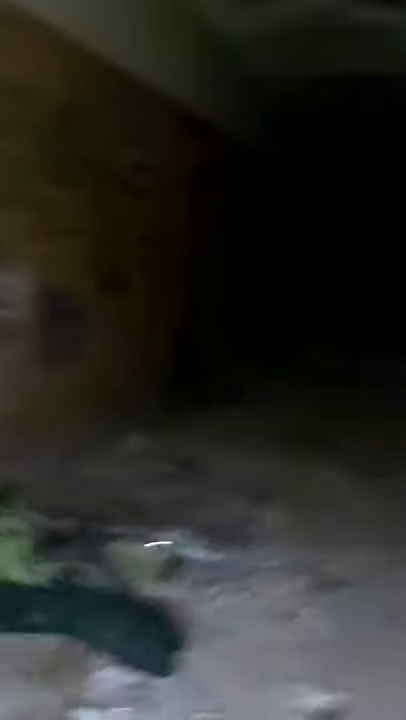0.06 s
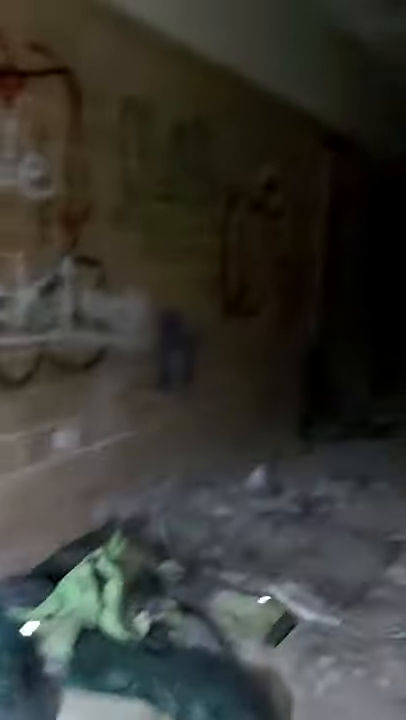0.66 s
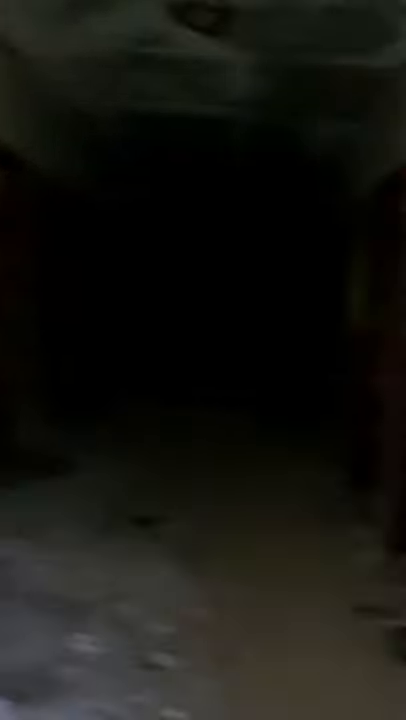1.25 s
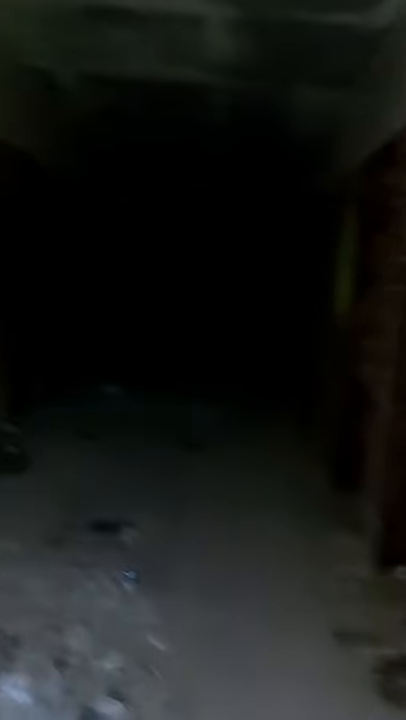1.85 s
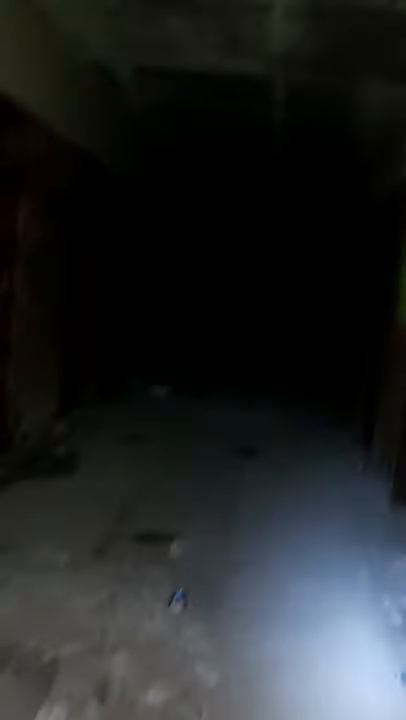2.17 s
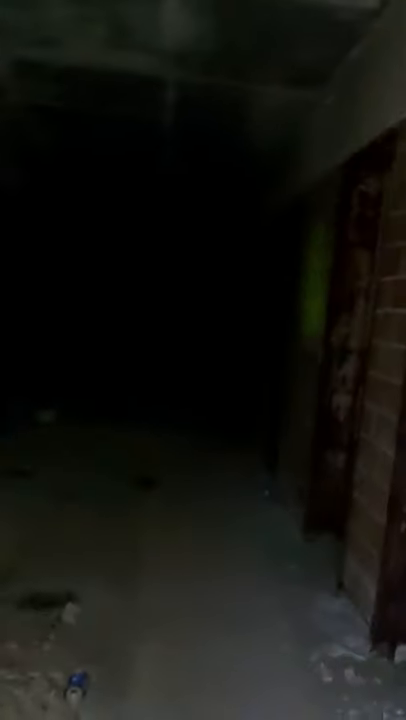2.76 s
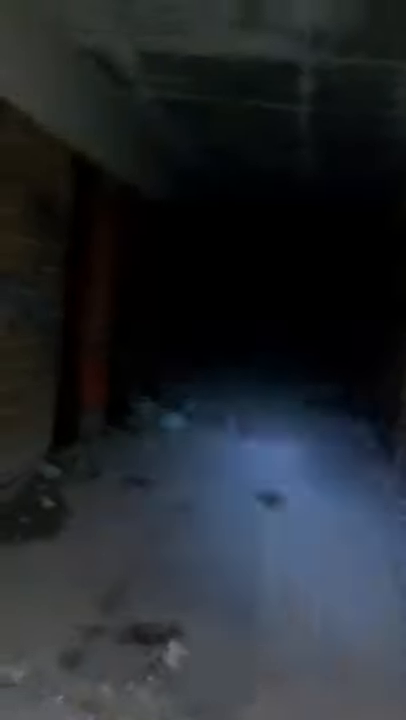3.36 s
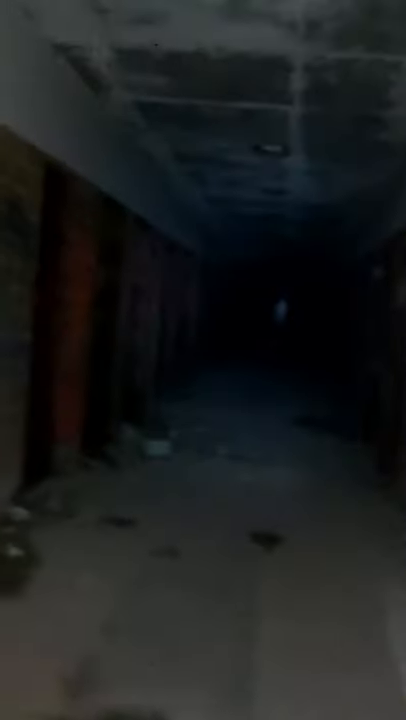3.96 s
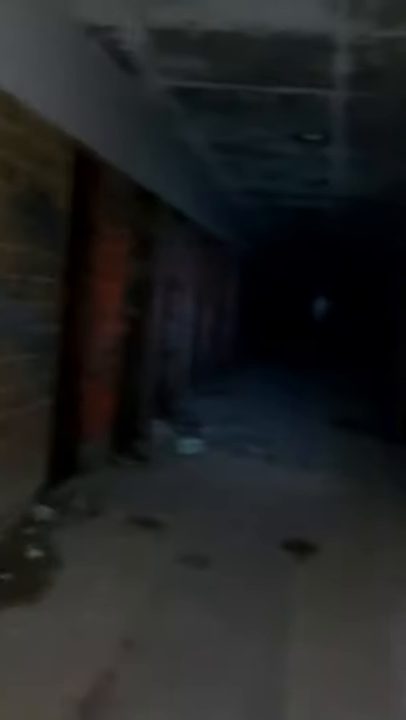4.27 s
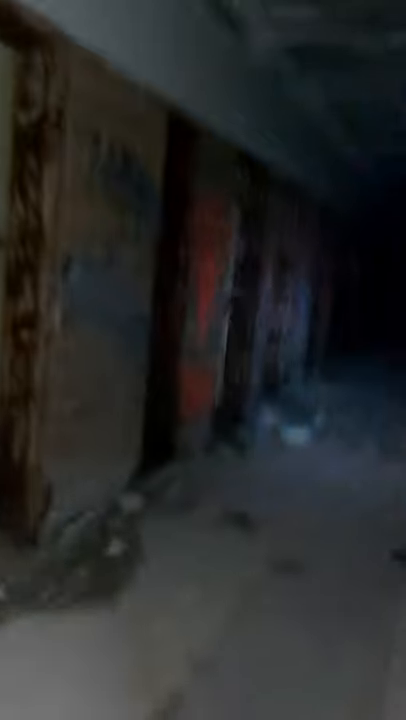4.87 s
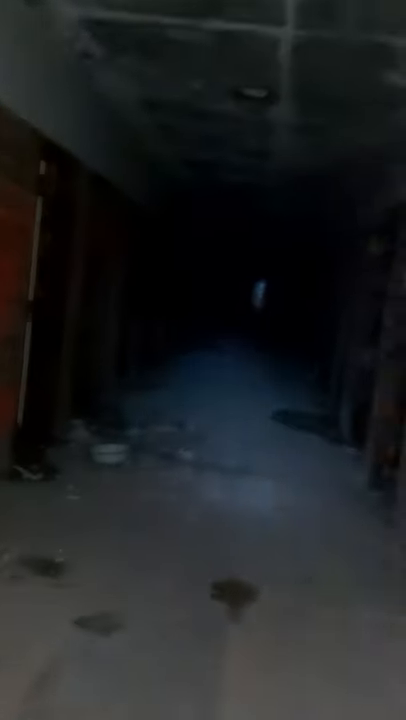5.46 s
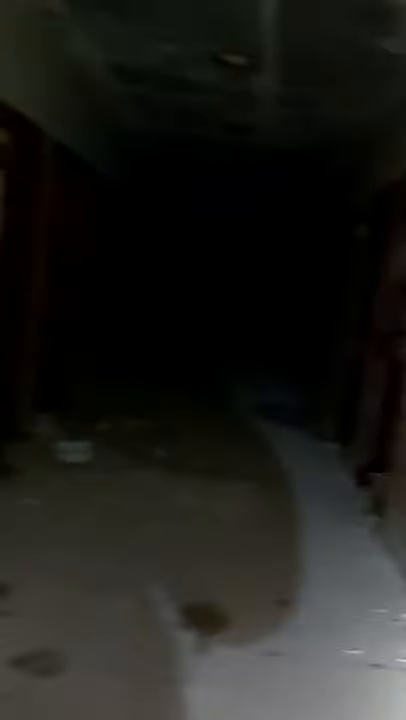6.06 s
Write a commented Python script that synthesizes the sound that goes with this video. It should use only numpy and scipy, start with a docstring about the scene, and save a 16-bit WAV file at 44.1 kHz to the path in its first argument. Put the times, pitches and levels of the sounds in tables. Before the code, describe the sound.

Slow footsteps crunch over grit and broken plaster in an empty concrete corridor. The first steps are heavy, with dull heel thuds, sharp snaps and a tiny chink of glass. They turn lighter, with soft scuffs and cracking chips, until one loud, crisp crunch near the end. The walls add a short echo and a faint hollow drone. The close handheld microphone picks up a few small ticks from the hand.

```python
"""Slow footsteps crunch over grit and plaster debris on the concrete floor of a long empty corridor.
Each sole contact crushes a shower of grains, a random train of impulses that excites brief resonances;
single chips crack under the shoe, heels thud, bits of grit snap and glass splinters chink.
The bare walls answer with quick reflections, a duller tail and a wavering hollow drone;
the hand bumps and ticks on the microphone."""
import sys
import numpy as np
from scipy import signal
from scipy.fft import rfft, irfft
from scipy.io import wavfile
from scipy.ndimage import uniform_filter1d

SR = 44100
rng = np.random.default_rng(int(sys.argv[2]) if len(sys.argv) > 2 else 0)


def log_audio(samples):
    """Write samples as a 16-bit WAV file to the path given in sys.argv[1]."""
    # one column per channel
    frames = np.atleast_2d(samples).T
    # limit to full scale, then quantise
    limited = np.clip(frames, -1, 1)
    pcm = np.round(limited * 32767).astype(np.int16)
    wavfile.write(sys.argv[1], SR, pcm)


N = 269318


# Footfalls: (time [s], heel lead [s], full weight [s], crunch [dB], grain pitch [Hz], fine grit [dB])
FOOTFALLS = [(0.005, 0.0077, 0.033, -29, 1590, -39.5), (0.369, 0.042, 0.048, -27.5, 1670, -29.5),
             (0.908, 0.027, 0.017, -27.5, 1960, -25), (1.681, 0.057, 0.13, -41.5, 2440, -33.5),
             (2.461, 0.053, 0.071, -51, 1920, -42), (3.303, 0.004, 0.065, -53, 1830, -37.5),
             (4.075, 0.057, 0.022, -47.5, 1800, -42.5), (4.924, 0.0049, 0.011, -21.5, 4450, -23.5),
             (5.675, 0.043, 0.071, -41.5, 2650, -40.5)]
def steps(press_t60_s=0.063, roll_t60_s=0.34):
    """Contact force drives the crunch in three phases: heel touch, full weight, roll of the sole."""
    out, t = np.zeros(N), np.arange(SR * 3 // 4) / SR
    for s, lead, hold, crunch_db, hz, grit_db in FOOTFALLS:
        touch = from_db(-6) * envelope(t, lead, press_t60_s)
        press = envelope(t - lead, hold, press_t60_s)
        roll = from_db(-38) * envelope(t - lead, hold, roll_t60_s)
        load = np.max([touch, press, roll], axis=0)
        add(out, s - lead, crush(s, load, crunch_db, hz, grit_db))
    return out


# Drags of the sole: (time [s], rise [s], slide [s], crunch [dB], grain pitch [Hz], fine grit [dB])
SOLE_DRAGS = [(0.134, 0.0032, 0.035, -35.5, 1340, -40), (0.233, 0.0096, 0.029, -35.5, 1780, -42),
              (0.487, .006, 0.014, -43, 1080, -66), (0.87, 0.0022, 0.02, -53, 1220, -32.5),
              (0.888, .003, 0.01, -53, 3000, -39), (0.998, 0.012, 0.078, -54, 2700, -42),
              (1.068, 0.014, 0.014, -37, 1800, -48), (1.187, 0.018, 0.09, -52.5, 2040, -48),
              (1.362, 0.039, 0.034, -53, 1800, -50), (1.692, 0.0043, 0.023, -46, 4700, -34),
              (1.856, 0.0027, 0.031, -43, 2610, -62), (1.924, 0.022, 0.16, -50, 1160, -49),
              (2.063, 0.012, 0.17, -52.5, 1950, -55.5), (2.265, 0.0024, 0.031, -43, 4300, -35),
              (2.582, 0.011, 0.058, -48, 2170, -45), (2.968, 0.0038, 0.14, -62, 2310, -50),
              (3.011, 0.0025, 0.0067, -47, 5940, -55), (3.086, 0.0026, 0.0077, -38, 4130, -54),
              (3.715, 0.061, 0.14, -49.5, 2140, -45.5), (3.935, 0.00084, 0.15, -61, 2550, -46),
              (4.113, 0.0047, 0.0049, -41, 6540, -55), (4.21, .03, 0.15, -79, 2500, -53.5),
              (4.377, 0.0034, 0.83, -53, 2330, -53), (4.647, 0.0015, 0.038, -44.5, 2610, -58),
              (4.772, 0.015, 0.19, -55.5, 1830, -45), (5.107, 0.0047, 0.075, -39.5, 2400, -36.5),
              (5.369, 0.0084, 0.011, -47.5, 2250, -37.5), (5.466, 0.0044, 0.13, -54, 2900, -43.5),
              (5.846, 0.0028, 0.052, -38.5, 3070, -35), (5.977, 0.018, 0.1, -45, 2110, -47)]
def scuffs(sag_db_per_s=19.5):
    """Sliding friction: a sole bites into the grit and eases off."""
    out, t = np.zeros(N), np.arange(SR // 2) / SR
    for s, rise, slide, crunch_db, hz, grit_db in SOLE_DRAGS:
        load = envelope(t, slide, t60=0.22, attack=rise) * from_db(-sag_db_per_s * t)
        add(out, s, crush(s, load, crunch_db, hz, grit_db))
    return out


# Rub of the sole at a crunch of -40 dB, loudest on the deep litter at the start: (time [s], level [dB])
SOLE_RUB = [(0, -41), (1.0, -41.5), (2.3, -59), (4.1, -52.5), (4.9, -65)]
# Click spectrum of one fine grain: (frequency [Hz], level [dB])
GRIT_SPECTRUM = [(200, -15.5), (500, -2), (1200, 1), (2800, 3), (4600, 3), (6200, -1.5), (8000, -2.5),
                 (9200, 1), (11500, -0.5), (16000, 4.5)]
def crush(s, load, crunch_db, hz, grit_db, size_spread=1.246, ring_spread=1.536):
    """Shot noise: a stick-slip load drives fine grit, the sole's dull rub and three sizes of grain."""
    count = len(load)
    load = load * from_db(2.5 * waver(count, per_s=217.2))
    rub_db = np.interp(s, *np.transpose(SOLE_RUB)) + 0.9 * (crunch_db + 40)
    grit_click = unit_energy(coloured(signal.unit_impulse(128, 64), GRIT_SPECTRUM))
    layers = [(grit_db, grit_click, fractures(count, per_s=2200, uneven_db=6.5)),
              (rub_db, grain_ring(hz=501, spread=1.564), fractures(count, per_s=2000, uneven_db=4.5))]
    for size in (1 / size_spread, 1, size_spread):
        ring = grain_ring(hz / size, ring_spread) / np.sqrt(3)
        layers.append((crunch_db, ring, fractures(count, per_s=830, uneven_db=3.5)))
    return sum(from_db(db) * signal.fftconvolve(clicks * load, ring)[:count]
               for db, ring, clicks in layers)


def fractures(count, per_s, uneven_db):
    """A Poisson process of impulses, mostly small and a few large; rms 1."""
    sizes = from_db(uneven_db * np.minimum(rng.exponential(1, count), 4))
    signs = rng.choice([-1, 1], count)
    breaks = rng.random(count) < per_s / SR
    return unit_energy(sizes * signs * breaks) * np.sqrt(count)


def grain_ring(hz, spread, size=1024):
    """Impulse response of one grain: the wider its band, the briefer its ring."""
    return unit_energy(band(signal.unit_impulse(size), hz / spread, hz * spread))


# Breaking chips, the row at 1.6927 s being a strong wall reflection of the chip just before it: (time [s],
# level [dB], pitch [Hz], corridor send [dB], 60 dB decay [cycles])
PLASTER_CHIPS = [(0.136, -27, 740, -3, 4.8), (0.17, -25, 750, -14, 7.1), (0.3823, -19, 4230, -25, 26),
                 (0.417, -25.5, 1840, 3, 9.6), (0.5917, -27, 1000, -20, 3.7), (0.8253, -39, 4060, 4.5, 3.6),
                 (0.878, -25, 800, -5.5, 5.4), (1.685, -18, 2180, -20, 9), (1.6927, -17, 2160, -16, 8.4),
                 (1.719, -21, 4720, -4.5, 19), (1.7728, -16.5, 1750, -12, 6.7),
                 (1.785, -20.5, 1620, -10, 7.6), (1.795, -25, 1640, -8, 18), (2.035, -16.5, 2230, -10, 7.7),
                 (2.658, -36, 2010, -2, 3.3), (3.088, -31.5, 2400, -7, 13), (3.1, -31, 2360, -7, 12),
                 (3.302, -34.5, 2900, -1.5, 4.4), (3.327, -28.5, 2100, -12.5, 4),
                 (3.829, -36.5, 2360, -9, 12), (4.026, -35, 2600, -14, 7.4), (4.088, -31, 1820, -3.5, 4.1),
                 (4.124, -26, 5750, -5, 12.6), (4.899, -31, 4000, 3, 16), (4.919, -19, 2600, -18, 5.9),
                 (4.929, -19, 4560, -9, 7), (4.9406, -15.5, 4470, -3.5, 9),
                 (5.221, -20.5, 1710, -11.5, 7.9), (5.294, -23, 1790, -24, 9.1),
                 (5.4537, -21.5, 2320, -17, 5.1), (5.6376, -27.5, 2320, -10, 7.6),
                 (5.6806, -24.5, 2100, -7, 6.6), (5.891, -25, 2250, -11, 4.8),
                 (6.059, -35, 1720, -3.5, 10.5)]
def chips(overtone_ratio=1.97, wall_echo_s=0.0087, wall_echo_db=-9.5):
    """Brittle fracture excites two damped modes; a wall reflects them. Gives near and corridor feeds."""
    near, sent, t = np.zeros(N), np.zeros(N), np.arange(SR // 50) / SR
    for s, db, hz, room_db, cycles in PLASTER_CHIPS:
        age, phase = t * hz / cycles, 2 * np.pi * hz * t
        modes = np.sin(phase) + from_db(-15.5) * np.sin(phase * overtone_ratio)
        ring = modes * np.minimum(age / 0.12, 1) * from_db(-60 * age)
        crack = band(rng.standard_normal(len(t)) * decay(t, t60=0.0023), hz / 2, hz * 3.5)
        sound = from_db(db + 11.5) * (unit_peak(ring) + from_db(-9) * crack)
        for delay, path_db in ((0, 0), (wall_echo_s, wall_echo_db)):
            add(near, s + delay, from_db(path_db) * sound)
            add(sent, s + delay, from_db(path_db + room_db) * sound)
    return near, sent


def crumbs():
    """Damping sets bandwidth: each chip sheds grains near its pitch, broader the less it rings."""
    out, t = np.zeros(N), np.arange(SR // 8) / SR
    load = envelope(t, hold=0.0049, t60=0.07)
    for s, db, hz, _, cycles in PLASTER_CHIPS:
        add(out, s, crush(s, load, db - 16, hz, db - 15.5, size_spread=1.07, ring_spread=1 + 1.9 / cycles))
    return out


# The loudest snaps of grit: (time [s], level [dB], pitch [Hz])
GRIT_SNAPS = [(0.3714, -13, 4230), (0.9095, -3, 3550), (0.919, -8, 11900), (0.9214, -8, 12200),
              (1.6268, -31, 5040), (1.9947, -26.5, 6500), (2.6568, -21.5, 4260), (2.6645, -33, 4500),
              (3.0873, -12.5, 11300), (3.0944, -10.5, 12300), (4.0245, -26, 3350), (4.1235, -18.5, 12000),
              (4.8288, -20.5, 13200), (4.9275, -5.5, 11800), (4.9404, -6, 4630), (5.466, -18, 5800)]
def snaps(table, t60, gain_db, body_db, sparkle_db):
    """A brief transient has a broad spectrum, here with a pitched body and a glassy top."""
    out, t = np.zeros(N), np.arange(SR // 50) / SR
    for s, db, hz, *_ in table:
        broad, body, top = rng.standard_normal((3, len(t))) * decay(t, t60)
        burst = (unit_energy(band(broad, 1770, 10500))
                 + from_db(body_db) * unit_energy(band(body, hz / 1.25, hz * 1.19))
                 + from_db(sparkle_db) * unit_energy(band(top, 10960, 17000)))
        add(out, s, from_db(db + gain_db) * unit_peak(burst))
    return out


# Heel thuds and knocks on the litter: (time [s], level [dB], pitch [Hz])
HEEL_THUDS = [(0.23, -21, 268), (0.2488, -16, 318), (0.261, -28.5, 130), (0.59, -30.5, 312),
              (0.88, -22.5, 350), (0.924, -17, 540), (1.113, -27.5, 504), (2.027, -25, 526),
              (4.024, -38, 433), (4.122, -37.5, 520), (5.2, -36, 310)]
def thuds():
    """A soft impact puts its energy into low frequencies: heels land dully."""
    out = np.zeros(N)
    for s, db, hz in HEEL_THUDS:
        add(out, s, from_db(db - 9) * soft_blow(hz, cycles=4.2))
    return out


def soft_blow(hz, cycles):
    """A heavily damped oscillation of one or two swings; peak 1."""
    t = np.arange(SR // 6) / SR
    return unit_peak(np.sin(2 * np.pi * hz * t) * t * decay(t, cycles / hz))


def loose_grains(crunch):
    """Amplitude modulation: sand springs away in glassy clicks that follow the crunch's treble."""
    treble_power = uniform_filter1d(band(crunch, 5500, 19845) ** 2, size=600)
    grinding = np.sqrt(np.maximum(treble_power, 0))
    rings = [grain_ring(hz, spread=1.05, size=128) for hz in (5200, 11800, 14000)]
    clicks = sum(np.convolve(fractures(N, per_s=160, uneven_db=-5), ring)[:N] for ring in rings)
    return from_db(-20) * grinding * clicks


# Glass shifting underfoot: (time [s], level [dB], pitch [Hz])
GLASS_SPLINTERS = [(1.019, -30, 10670), (1.053, -36, 11500), (5.219, -30, 14200), (5.294, -33, 14000)]
def splinters(spread=1.04):
    """Narrow resonance: a splinter rocks under the sole with a thin, high chink."""
    out, t = np.zeros(N), np.arange(SR // 30) / SR
    for s, db, hz in GLASS_SPLINTERS:
        chink = band(rng.standard_normal(len(t)) * decay(t, t60=0.03), hz / spread, hz * spread)
        add(out, s, from_db(db) * unit_peak(chink))
    return out


# Reverberation time of the corridor: (frequency [Hz], 60 dB decay [s])
REVERB_TIMES = [(120, 0.71), (400, 0.72), (1000, 0.55), (3000, 0.57), (6000, 0.45), (14000, 0.46)]
def corridor_response(build_up_s=0.0011, early_db=-5.5, tail_db=-7):
    """Reverberation: near walls give dense early reflections; the hall rings on, longest in the bass."""
    t = np.arange(SR) / SR
    white = rng.standard_normal((2, SR))
    edges = np.geomspace(40, 19000, num=10)
    tail = 0
    for low, high in zip(edges, edges[1:]):
        t60 = at_hz(REVERB_TIMES, np.sqrt(low * high))
        tail += band(rng.standard_normal((2, SR)), low, high) * decay(t, t60)
    arrival = np.minimum(t / build_up_s, 1) ** 2
    early = from_db(early_db) * unit_energy(white * arrival * decay(t, t60=0.074))
    late = from_db(tail_db) * unit_energy(tail * arrival)
    return two_ports(early + late, coherence=0.033)


def corridor(x, patterns=5, crossfade_s=0.014):
    """Echo paths depend on position: as feet and microphone move, the sound meets changing patterns."""
    place = np.arange(N) / SR / crossfade_s
    out = 0
    for k in range(patterns):
        distance = np.abs((place - k) % patterns - patterns / 2)
        share = np.cos(np.pi / 2 * np.minimum(distance, 1))
        out += signal.fftconvolve((x * share)[None], corridor_response(), axes=1)[:, :N]
    return out


# Modes between walls, floor and ceiling: (frequency [Hz], 60 dB decay [s], gain [dB])
CROSS_MODES = [(122, 0.19, 8), (297, 0.75, -10.5), (420.6, 0.19, 3.5)]
def standing_waves(x):
    """Each cross mode of the corridor rings as a damped second-order resonator."""
    out = np.zeros(N)
    for hz, t60, db in CROSS_MODES:
        radius = decay(1 / SR, t60)
        feedback = [1, -2 * radius * np.cos(2 * np.pi * hz / SR), radius ** 2]
        out += from_db(db) * signal.lfilter([1 - radius, 0, radius - 1], feedback, x)
    return out


# Dry ticks at the right microphone port: (time [s], level [dB], pitch [Hz], hollow knock [dB])
HAND_TICKS = [(1.115, -22, 13500, -39), (1.4378, -33, 1430, -30), (2.872, -27, 7200, -36),
              (2.901, -29.5, 7200, -36.5), (3.6228, -39.5, 2200, -57), (3.6325, -42, 15000, -62),
              (4.0356, -27, 14600, -28)]
# Bumps of the hand on a port: (time [s], level [dB], pitch [Hz], left minus right [dB])
HAND_BUMPS = [(3.148, -65, 70.4, -27), (3.761, -62, 63, -26), (4.63, -53, 58, 25), (5.116, -51.5, 118, -21),
              (5.195, -56, 55, -23)]
def handling(tick_leak_db=-43):
    """Structure-borne sound: ticks and bumps of the hand reach mainly one port and never the room."""
    ticks = snaps(HAND_TICKS, t60=0.004, gain_db=3, body_db=-3, sparkle_db=3.5)
    knock = unit_peak(grain_ring(hz=1720, spread=1.96))
    for s, _, _, knock_db in HAND_TICKS:
        add(ticks, s, from_db(knock_db) * knock)
    left, right = from_db(tick_leak_db) * ticks, ticks
    for s, db, hz, pan_db in HAND_BUMPS:
        bump = from_db(db + 9.5) * soft_blow(hz, cycles=4.8)
        add(left, s, from_db(min(pan_db, 0)) * bump)
        add(right, s, from_db(min(-pan_db, 0)) * bump)
    return np.array([left, right])


# Swells of the corridor's drone: (time [s], level [dB])
DRONE_LEVELS = [(0.0, -34), (0.2, -50), (0.24, -34), (0.5, -56), (0.83, -105), (0.882, -39), (1.05, -50),
                (1.268, -58.5), (1.511, -70.5), (1.77, -44), (2.1, -53.5), (2.42, -58.5), (2.62, -70),
                (2.93, -72), (3.03, -59.5), (3.42, -54), (3.62, -93), (3.79, -52.5), (3.97, -62),
                (4.15, -59.5), (4.6, -59), (5.75, -59.5), (5.9, -53.5)]
# Spectrum of the drone: (frequency [Hz], spectral density [dB])
DRONE_SPECTRUM = [(60, -26.5), (130, -14), (220, -12.5), (275, -8.5), (318, 0), (390, -7.5), (480, -4.5),
                  (630, -15.5), (1500, -31.5)]
def hollow_drone(waver_db=2):
    """Noise with a spectral peak has a faint pitch: a hollow drone near 318 Hz that swells and wavers."""
    db = np.interp(np.arange(N) / SR, *np.transpose(DRONE_LEVELS)) + waver_db * waver(N, per_s=16)
    return from_db(db - 4) * diffuse_noise(DRONE_SPECTRUM)


# Still air of the building: (frequency [Hz], spectral density [dB])
AIR_SPECTRUM = [(25, -4), (60, 5), (120, 1), (200, -7), (330, 2.5), (700, -7.5), (1600, -6.5), (2500, -1.5),
                (5000, -6.5), (9000, -13), (12000, -10.5), (16000, -2)]
def still_air():
    """Stationary broadband noise forms the faint ambient floor."""
    return from_db(-62) * diffuse_noise(AIR_SPECTRUM)


def diffuse_noise(spectrum):
    """A diffuse field is only weakly coherent between the ports in the treble; rms 1."""
    noise = two_ports(coloured(rng.standard_normal((2, N)), spectrum), coherence=0.16)
    return noise / noise.std()


# Left port against the right: (frequency [Hz], gain [dB])
LEFT_GAIN = [(40, -17), (130, -5.5), (600, -5), (1300, -4.5), (2500, -6.5), (5500, -3), (9000, 5),
             (13000, -8)]
def two_ports(pair, coherence, lag_s=0.00052, left_first=0.58, crossover_hz=420):
    """Spatial coherence: from two unrelated signals, bass is shared; treble meets either port first."""
    hz = np.fft.rfftfreq(pair.shape[-1], 1 / SR)
    treble = hz ** 2 / (hz ** 2 + crossover_hz ** 2)
    delay = np.exp(-2j * np.pi * hz * lag_s * treble)
    shared = (1 - treble * (1 - coherence)) * (left_first / delay + (1 - left_first) * delay)
    right, unrelated = rfft(pair)
    left = shared * right + np.sqrt(np.maximum(1 - np.abs(shared) ** 2, 0)) * unrelated
    return irfft(np.array([left * from_db(at_hz(LEFT_GAIN, hz)), right]), pair.shape[-1])


def round_the_hand(x, size=64):
    """Diffraction round the hand smears sound over about a millisecond and keeps its colour."""
    smear = irfft(np.exp(2j * np.pi * rng.random(size // 2 + 1)))
    return np.convolve(x, smear, "same")


def envelope(t, hold, t60, attack=0.001):
    """Linear rise of at least 1 ms, then exponential decay from time `hold`."""
    return np.clip(t / max(attack, 0.001), 0, 1) * decay(np.maximum(t - hold, 0), t60)


def waver(count, per_s):
    """Interpolated Gaussian noise, spread about 1."""
    return np.interp(np.arange(count) * per_s / SR, np.arange(count), rng.standard_normal(count))


def decay(t, t60):
    return from_db(-60 * t / t60)


def from_db(db):
    return 10 ** (np.asarray(db) / 20)


def unit_energy(x):
    return x / np.sqrt(np.sum(x ** 2, axis=-1, keepdims=True) + 1e-20)


def unit_peak(x):
    return x / np.abs(x).max()


def at_hz(points, hz):
    """Interpolation on a log-frequency axis."""
    frequencies, values = np.transpose(points)
    return np.interp(np.log(np.maximum(hz, 1)), np.log(frequencies), values)


def add(track, s, sound):
    """Superpose a sound on a track at time s."""
    start = int(np.clip(s * SR, 0, N - 1))
    track[start:start + len(sound)] += sound[:N - start]


def band(x, low_hz, high_hz):
    edges = [low_hz, min(high_hz, 0.45 * SR)]
    return signal.sosfilt(signal.butter(2, edges, "band", fs=SR, output="sos"), x)


def coloured(x, spectrum):
    hz = np.fft.rfftfreq(x.shape[-1], 1 / SR)
    return irfft(rfft(x) * from_db(at_hz(spectrum, hz)), x.shape[-1])


def scene():
    """Superposition of the direct sound, the reverberant field, the background and handling noise."""
    ground = steps() + scuffs() + crumbs()
    grit = snaps(GRIT_SNAPS, t60=0.0036, gain_db=4, body_db=5, sparkle_db=7)
    loose = loose_grains(ground) + splinters()
    blows = thuds()
    cracks, cracks_sent = chips()
    near = from_db(-9) * (ground + grit + cracks) + blows + loose + standing_waves(blows + ground)
    direct = two_ports(np.array([near, round_the_hand(near)]), coherence=0.72)
    sent = ground + cracks_sent + from_db(-6.5) * grit + from_db(4.5) * blows + from_db(-8) * loose
    airborne = direct + corridor(sent) + hollow_drone() + still_air()
    return from_db(1.17) * airborne + handling()


# Overall tone colour, a slight midrange lift and a treble hollow near 9 kHz: (frequency [Hz], gain [dB])
TONE_COLOUR = [(650, 0), (950, 1.5), (1350, 1), (7400, 0.5), (9200, -10.5), (10800, -0.5), (12500, 1),
               (16000, -5.5)]
def record(dry, low_cut_hz=45, high_cut_hz=16000):
    """Linear filtering: the tone is coloured, deep bass is lost and the top is cut steeply."""
    low_cut = signal.butter(2, low_cut_hz, "high", fs=SR, output="sos")
    high_cut = signal.ellip(10, 0.2, 70, high_cut_hz, fs=SR, output="sos")
    return signal.sosfilt(high_cut, signal.sosfilt(low_cut, coloured(dry, TONE_COLOUR)))


dry = scene()
out = record(dry)
log_audio(out)
```